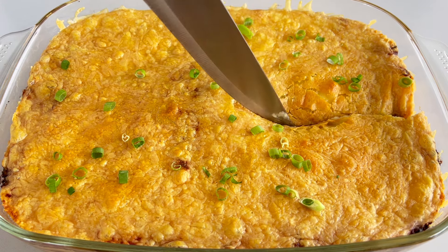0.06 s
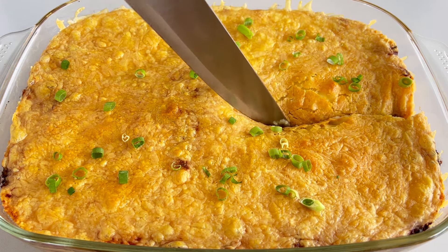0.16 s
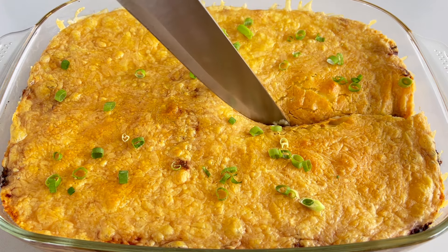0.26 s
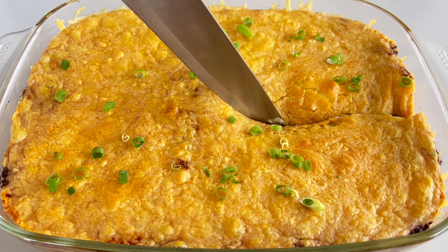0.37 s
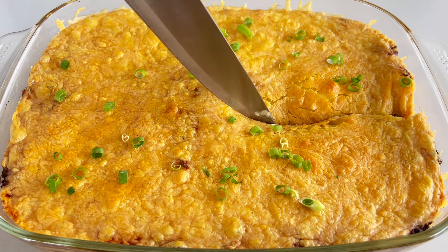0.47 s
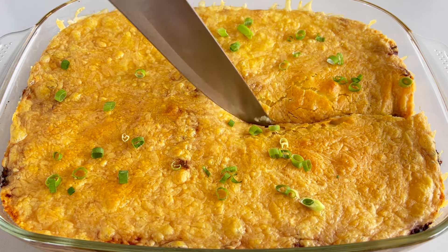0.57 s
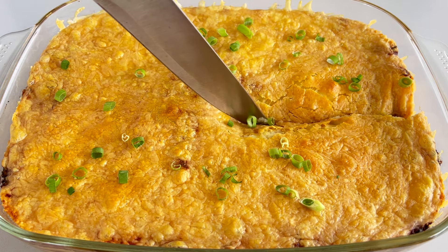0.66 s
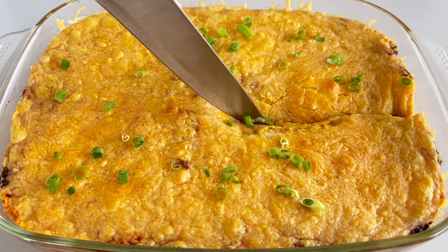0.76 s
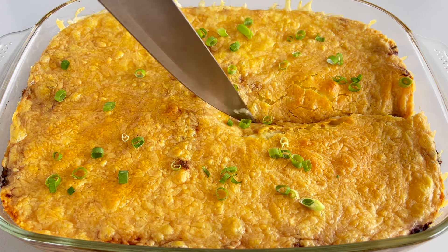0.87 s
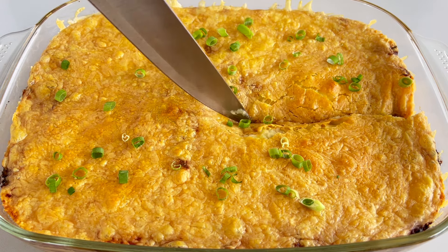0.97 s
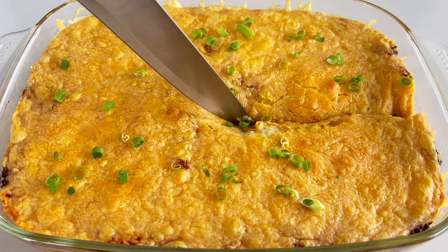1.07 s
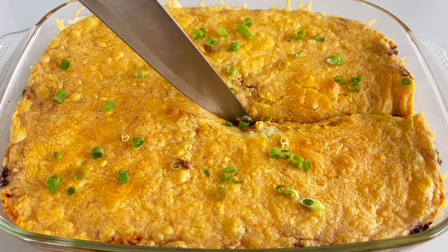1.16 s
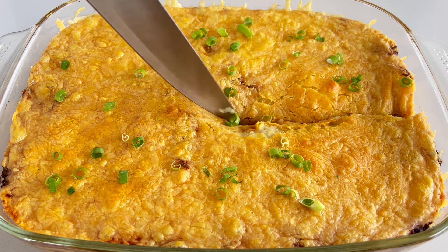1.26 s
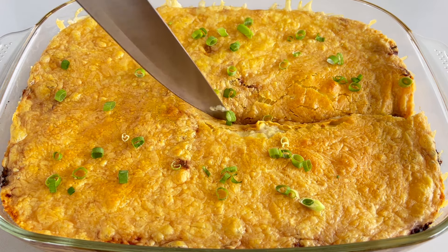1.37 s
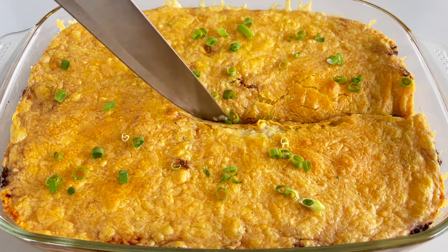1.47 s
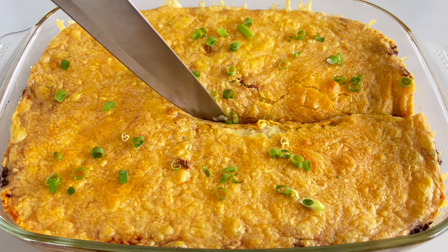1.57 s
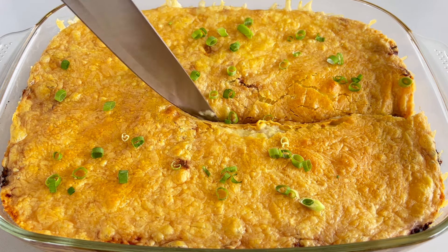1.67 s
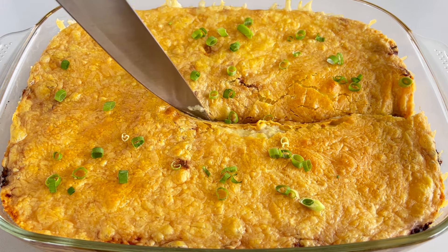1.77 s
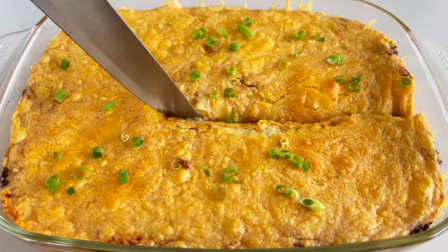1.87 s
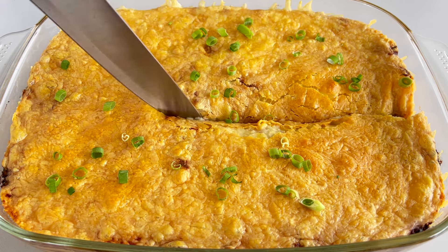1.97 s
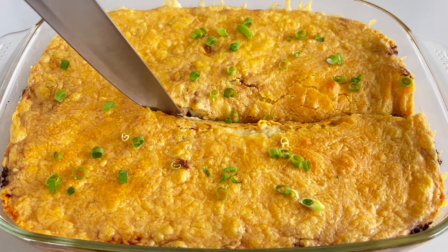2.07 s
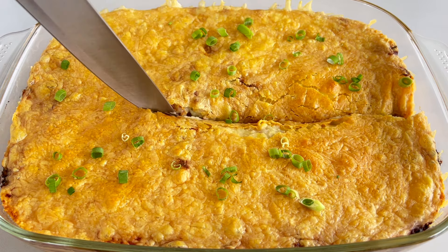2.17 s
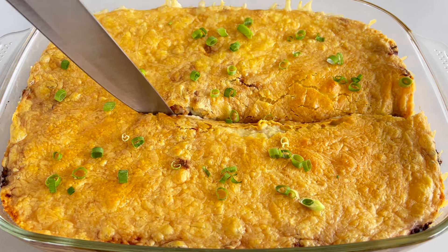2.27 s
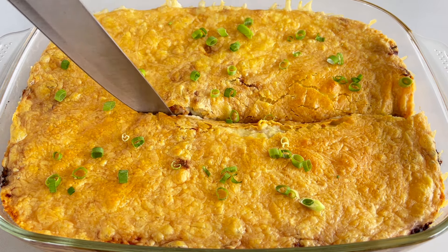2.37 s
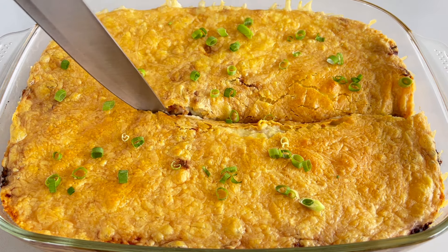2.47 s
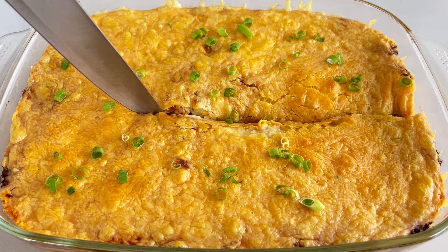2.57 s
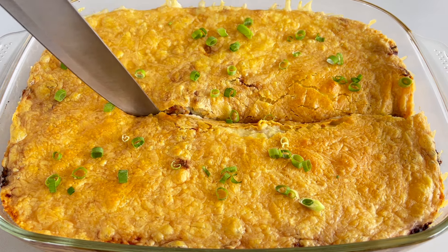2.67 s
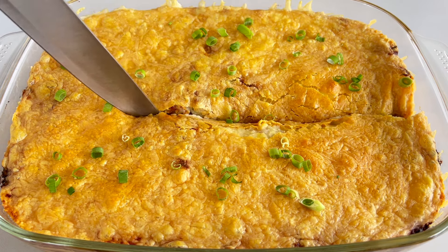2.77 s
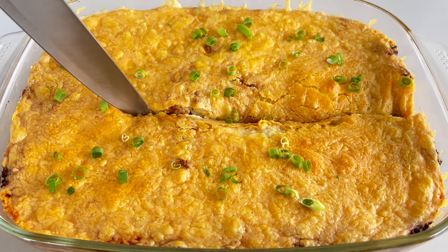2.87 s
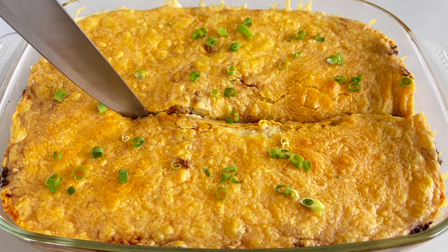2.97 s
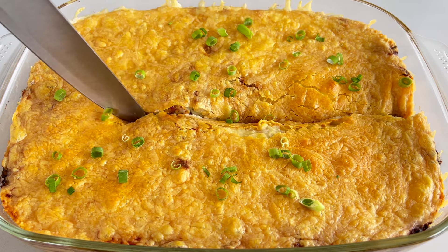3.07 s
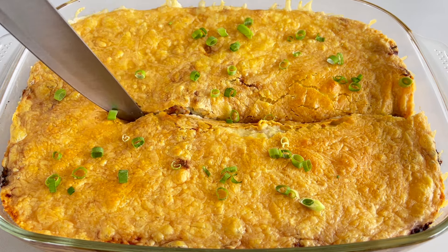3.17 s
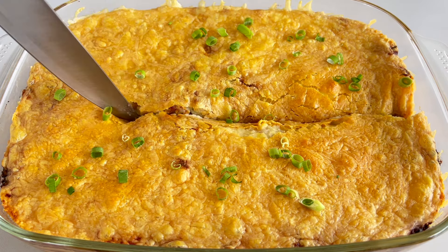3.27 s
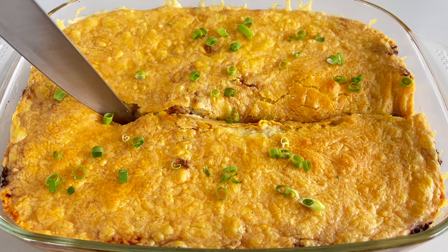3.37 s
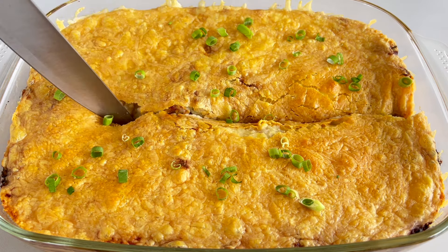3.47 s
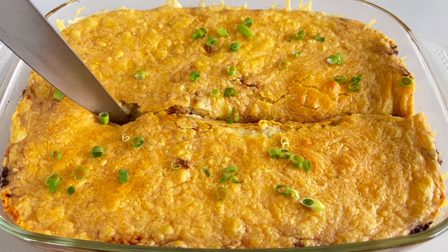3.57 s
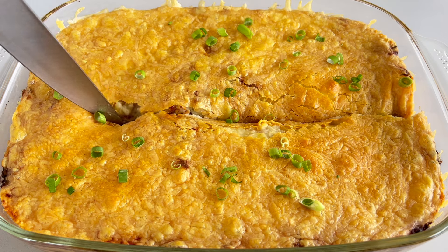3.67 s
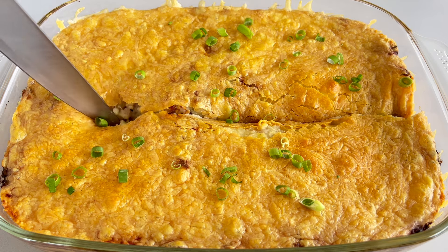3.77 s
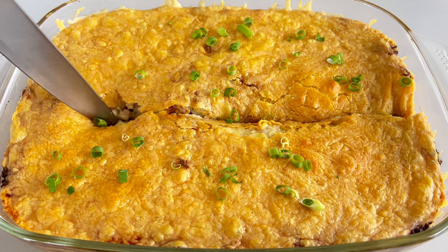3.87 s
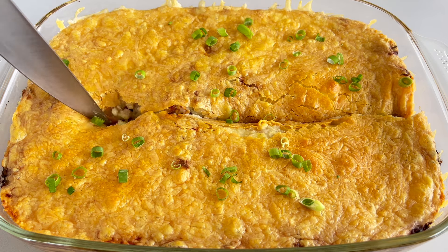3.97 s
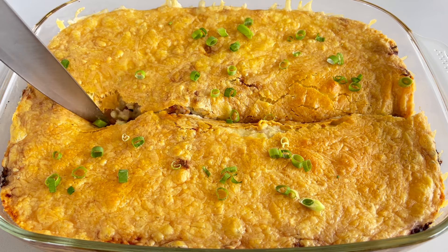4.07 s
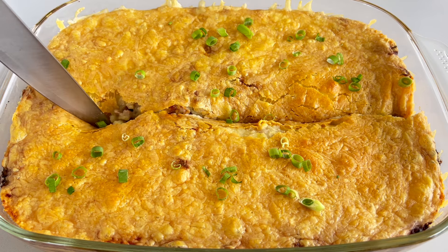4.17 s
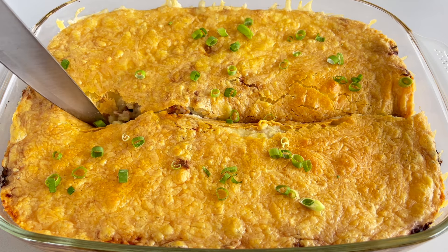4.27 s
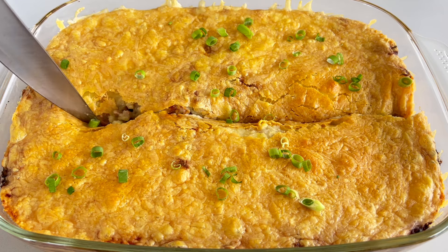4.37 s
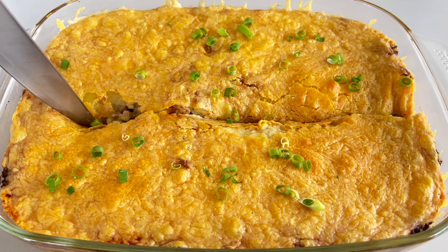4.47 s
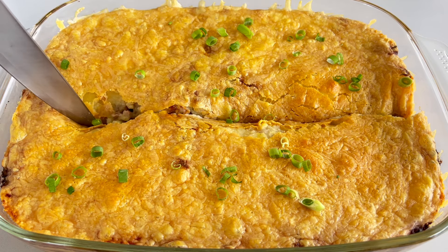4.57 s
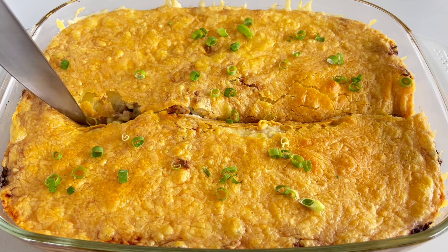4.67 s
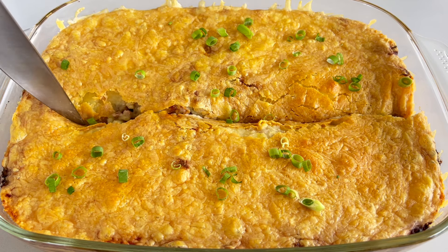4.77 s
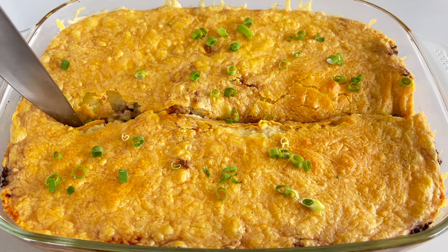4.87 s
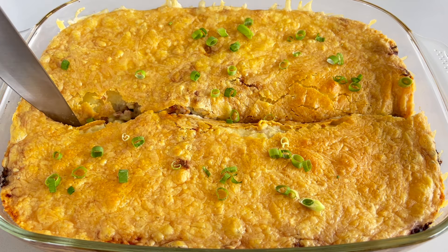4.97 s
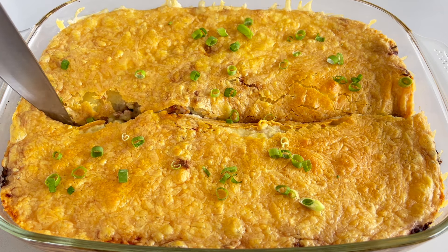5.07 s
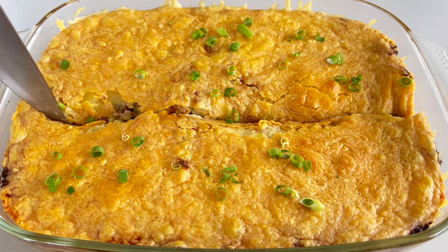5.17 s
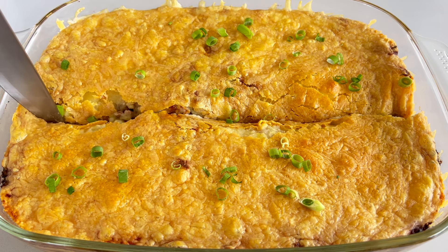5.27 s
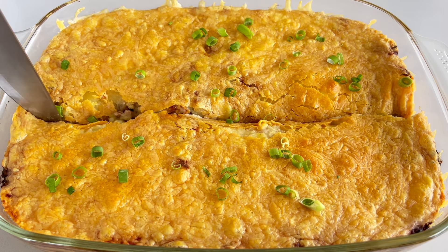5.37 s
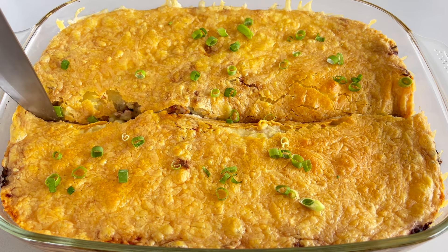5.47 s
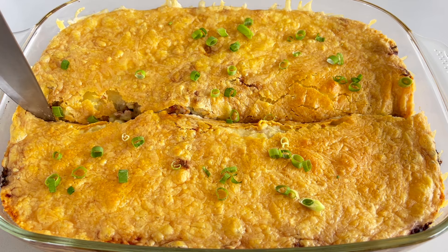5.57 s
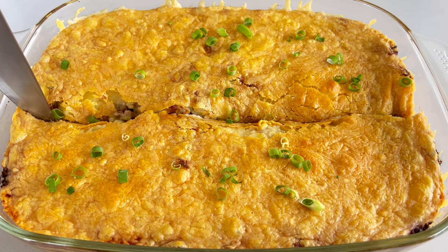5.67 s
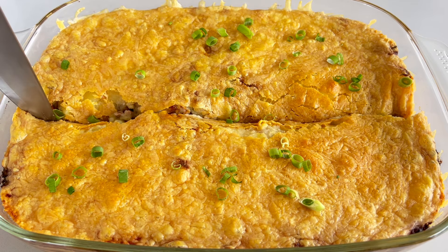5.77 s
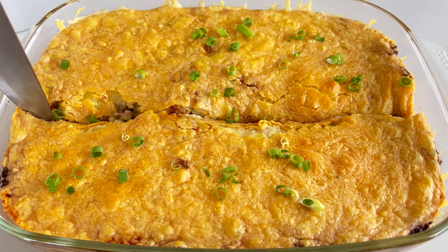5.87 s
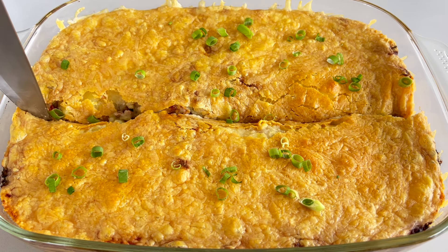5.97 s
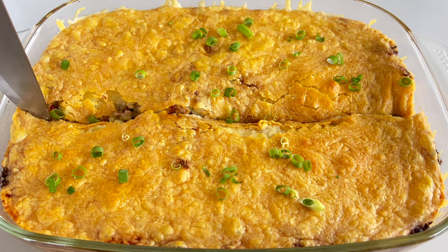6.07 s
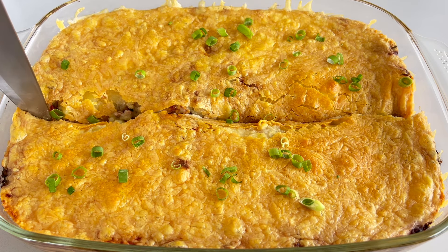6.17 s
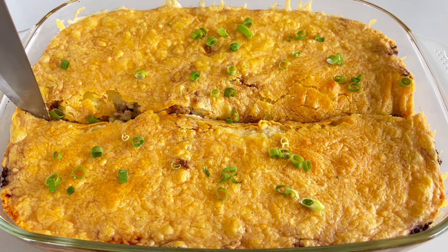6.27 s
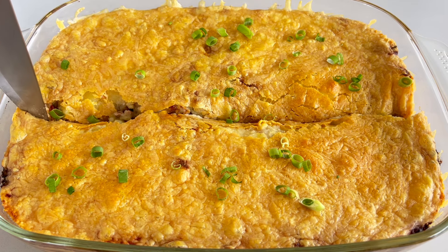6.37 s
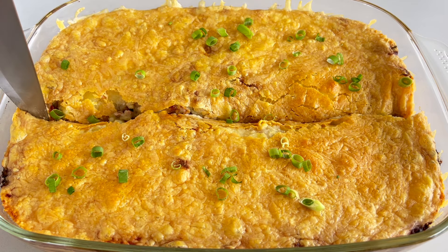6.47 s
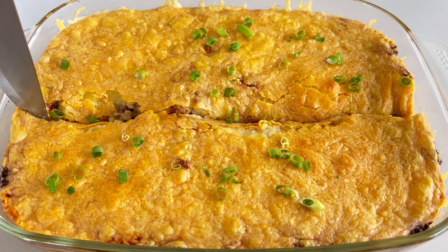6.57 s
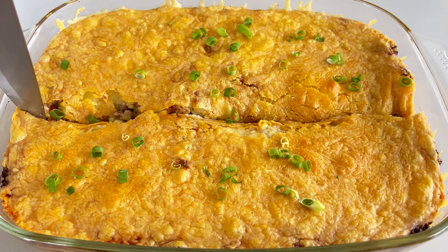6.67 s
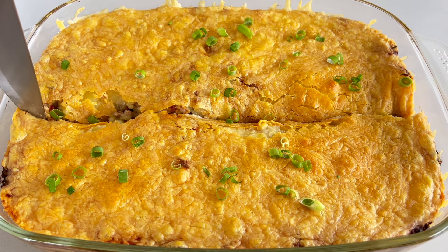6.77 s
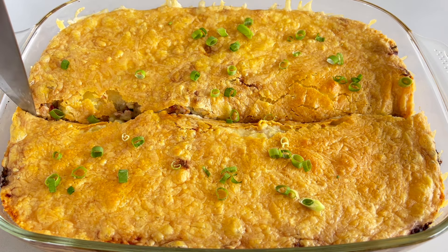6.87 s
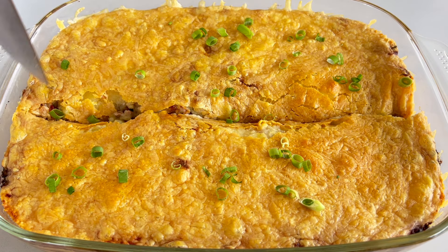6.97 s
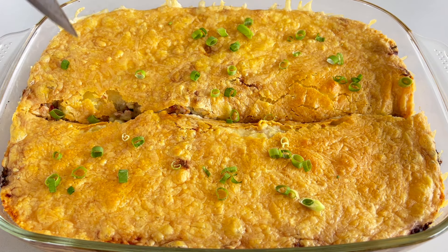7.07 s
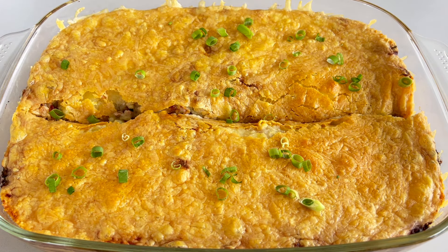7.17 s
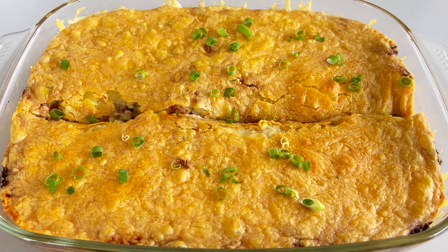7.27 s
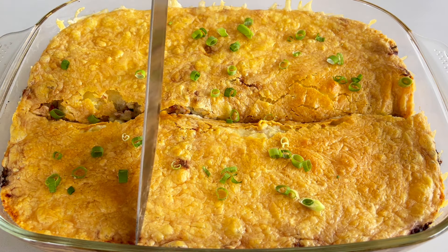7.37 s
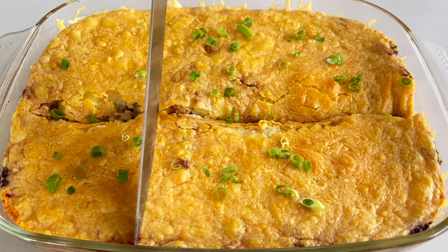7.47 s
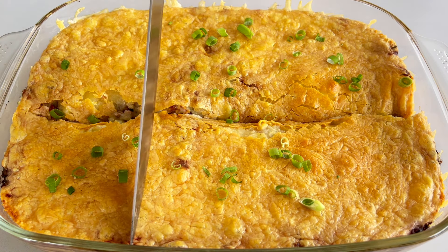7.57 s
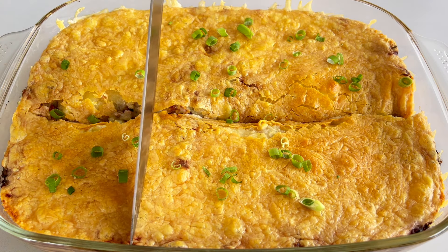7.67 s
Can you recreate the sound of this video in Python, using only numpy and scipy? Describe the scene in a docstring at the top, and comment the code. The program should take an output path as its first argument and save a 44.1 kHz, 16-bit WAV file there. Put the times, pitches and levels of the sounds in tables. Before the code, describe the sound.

A close stereo microphone hears a blade sawing in even strokes: airy rasp up, gritty crunch down, then a dull thud with a short glassy clack and blade tick. The dish is heavy and damped, so nothing rings long. The rhythm loosens near the end into scraping, small crust snaps and soft shoves. The small kitchen adds a slight short echo, quiet appliance noise and a wavering hum.

```python
"""A faint kitchen hum and a brief hiss, then a knife knocking on a glass dish, again and again.
Knocks ring damped dish modes plus a noise tick; scrapes drive the upper modes with random slips.
Between knocks the blade hisses through food (filtered noise and crumbs); the crust snaps (noise bursts).
Two close microphone ports hear the knife with unlike phase and level; a sparse echo follows.
The kitchen is coloured noise, a swelling rumble and two wavering tones."""
import sys
import numpy as np
from scipy import signal
from scipy.fft import rfft, irfft, next_fast_len
from scipy.io import wavfile

SR = 44100
rng = np.random.default_rng(int(sys.argv[2]) if len(sys.argv) > 2 else 0)


def output_pcm(signal):
    """Save a mono or channel-first signal as 16-bit PCM at the path in sys.argv[1].

    Samples are clipped to [-1, 1] before scaling.
    """
    pcm = np.clip(np.atleast_2d(signal).T, -1, 1) * 32767
    wavfile.write(sys.argv[1], SR, np.round(pcm).astype(np.int16))


N = 340893  # samples


def amp(db):
    """Decibels to gain."""
    return 10 ** (np.asarray(db) / 20)


def evened(x):
    """Scales to rms 1."""
    return x / np.sqrt(np.mean(x ** 2) + 1e-20)


def read(points, hz):
    """Reads a table on a log-frequency axis."""
    f, value = np.transpose(points)
    return np.interp(np.log(hz + 1), np.log(f + 1), value)


def along(points):
    """Reads the columns of a time curve at every sample."""
    s, *columns = np.transpose(points)
    return [np.interp(np.arange(N) / SR, s, c) for c in columns]


def add(mix, s, sound):
    """Mixes a sound in at time s."""
    part = mix[..., round(s * SR):][..., :sound.shape[-1]]
    part += sound[..., :part.shape[-1]]


def coloured(x, points):
    """Filters x by a table of gains."""
    size = next_fast_len(x.shape[-1])
    gain = amp(read(points, np.fft.rfftfreq(size, 1 / SR)))
    return irfft(rfft(x, size) * gain, size)[..., :x.shape[-1]]


def wander(hz):
    """Low-passed noise of rms 1, a slow random drift."""
    return evened(signal.lfilter(*signal.butter(2, hz, fs=SR), rng.standard_normal(N)))


def tone(hz, db):
    """A sine that wavers in level and pitch."""
    cycles = hz * np.arange(N) / SR + 0.06 * wander(1.3)
    return amp(db + 2 * wander(3)) * np.sqrt(2) * np.sin(2 * np.pi * cycles)


# appliance noise spectrum: (frequency [Hz], relative density [dB per Hz])
AIR_SPECTRUM = [(20, -31.5), (55, 3.5), (108, -3.5), (130, -13), (280, -13), (450, -16), (870, -25),
                (1100, -20.5), (1400, -21), (1780, -13), (2050, -23), (2500, -27.5), (2900, -39),
                (5000, -46.5), (6900, -34), (9000, -59), (16600, -78.5)]
# appliance noise likeness of the ports: (frequency [Hz], left-right correlation [-1..1])
AIR_LIKENESS = [(60, 1), (180, 0.77), (550, 0.32), (1650, -0.18), (4970, -0.12), (15000, -0.35)]
# swelling: (time [s], mean rumble level [dB], mean lower tone level [dB])
SWELL = [(0.0, -55.5, -64), (0.7, -53.5, -66.5), (1.3, -55.5, -62), (2.0, -49.5, -58), (2.6, -52.5, -52.5),
         (3.1, -53, -63.5), (3.7, -52, -69.5), (4.3, -56.5, -69), (5.05, -48, -59), (5.5, -57.5, -74),
         (6.3, -59, -77.5), (7.0, -74, -74), (7.73, -62.5, -70.5)]
AIR_DB = -52.5
HUM_HZ, HUM_MEAN_DB, DRONE_HZ = 444, -69, 218.8


def kitchen():
    """Steady appliance noise partly shared by the ports, a swelling rumble and two hum tones."""
    size = next_fast_len(N)
    left, other = rfft(rng.standard_normal((2, size)))
    same = np.clip(read(AIR_LIKENESS, np.fft.rfftfreq(size, 1 / SR)), -1, 1)
    right = same * left + np.sqrt(1 - same ** 2) * other
    pair = irfft(np.array([left, right]), size)
    air = amp(AIR_DB) * evened(coloured(pair, AIR_SPECTRUM))[:, :N]
    rumble_spectrum = [(20, -31.5), (55, -4), (100, -12.5), (220, -16.0), (400, -21.5), (800, -79.5)]
    rumble = evened(coloured(rng.standard_normal(N), rumble_spectrum))
    rumble_db, drone_db = along(SWELL)
    rumble *= amp(rumble_db + 1.6 * wander(3))
    return air + rumble + tone(HUM_HZ, HUM_MEAN_DB) + tone(DRONE_HZ, drone_db)


# echo decay: (frequency [Hz], t60 [s])
ECHO_DECAY = [(80, 0.3), (250, 0.24), (600, 0.34), (1500, 0.26), (4000, 0.29), (10000, 0.14)]


def room(x):
    """Sparse taps of random sign, each band dying at its own speed, partly shared by the ports."""
    places = np.arange(200, SR // 2, 20)
    taps = np.zeros((3, SR // 2 + 20))
    at = places + rng.integers(0, 20, (3, len(places)))
    np.put_along_axis(taps, at, rng.choice([-1., 1.], at.shape), 1)
    port_taps = taps[2] + 0.61 * taps[:2]
    hz, t, bands = signal.stft(port_taps, SR, nperseg=256)
    decay = amp(-60 * t / read(ECHO_DECAY, hz)[:, None])
    tail = signal.istft(bands * decay, SR, nperseg=256)[1]
    return signal.fftconvolve(x, tail / np.linalg.norm(tail[0]), axes=1)[:, :N]


# port phase: (frequency [Hz], left lead [rad])
PORT_LEAD = [(200, 0), (430, -.7), (780, 1.1), (1460, -.1), (3010, .8), (6120, 0), (7150, 0), (9900, -3.1),
             (13000, -6.2), (16400, -9)]
# port level: (frequency [Hz], left minus right [dB])
PORT_TILT = [(60, 1.4), (400, -0.2), (1500, -0.4), (4400, 4), (8100, 0.6), (15000, -1)]


def ports(x):
    """The two ports hear a near source with unlike phase and level."""
    size = next_fast_len(N)
    hz = np.fft.rfftfreq(size, 1 / SR)
    side = np.array([[0.5], [-0.5]])
    response = amp(side * read(PORT_TILT, hz)) * np.exp(1j * side * read(PORT_LEAD, hz))
    return irfft(rfft(x, size) * response, size)[:, :N]


# blade drawn up through the food: (middle [s], length [s], level [dB])
PULLS = [(0.0, .1, -67), (0.385, .17, -59), (0.823, 0.25, -63.5), (1.25, 0.22, -57), (1.654, 0.27, -64.5),
         (2.018, 0.15, -58.5), (2.431, .1, -66), (2.837, 0.19, -64), (3.203, 0.2, -65), (3.573, 0.17, -61),
         (3.928, 0.14, -59.5), (4.3, 0.16, -60), (4.654, 0.16, -62), (5.058, 0.19, -63), (5.474, 0.12, -62),
         (5.899, .14, -62.5), (6.245, 0.092, -65), (6.592, .11, -70.5), (7.057, .13, -68),
         (7.562, 0.11, -62.5)]
# blade pushed down through the crust: (landing [s], travel [s], level [dB])
PUSHES = [(0.15, 0.083, -58.5), (0.584, 0.09, -57), (1.04, 0.14, -59), (1.446, 0.1, -55.5),
          (1.849, 0.094, -60), (2.218, 0.07, -62), (2.608, 0.09, -62), (3.008, 0.068, -61),
          (3.384, 0.081, -63), (3.785, 0.18, -67), (4.119, 0.17, -66.5), (4.474, .11, -58.5),
          (4.864, 0.11, -56.5), (5.29, 0.24, -63), (5.717, 0.2, -63), (5.99, 0.023, -72),
          (6.439, .1, -71.5), (6.85, 0.078, -61.5)]
PULL_ARCH_POWER, PUSH_RISE_POWER, SETTLE_T60_S = 2.3, 1, 0.37


def strokes():
    """Rubbing strength: a pull arches up and down; a push grows until it lands, then settles."""
    t = np.arange(N) / SR
    pull, push = np.zeros(N), np.zeros(N)
    for middle, length, db in PULLS:
        arch = np.cos(np.pi * np.clip((t - middle) / length, -0.5, 0.5)).clip(0)
        pull += amp(db) * arch ** PULL_ARCH_POWER
    for landing, travel, db in PUSHES:
        rise = np.clip(1 + (t - landing) / travel, 0, 1) ** PUSH_RISE_POWER
        push += amp(db - 60 * np.maximum(t - landing, 0) / SETTLE_T60_S) * rise
    return pull, push


# rubbing spectrum: (frequency [Hz], relative density [dB per Hz])
RUB_SPECTRUM = [(1000, -32), (2500, -2), (4000, -5.5), (6000, -7.5), (8000, 1), (11000, -7.5),
                (15600, -0.5), (16200, -29.5)]
CRUMBS_PER_S, CRACKS_PER_S, CRACKS_DB = 1500, 160, -1.5  # cracks against the rub


def slide():
    """Rubbing: hiss mixed with tiny crumbs breaking; bits of crust crack, most of all in a push."""
    crumb_size = amp(4.1 * np.minimum(rng.exponential(1, N), 5))
    crumbs = crumb_size * (rng.random(N) < CRUMBS_PER_S / SR) * rng.choice([-1, 1], N)
    rub = evened(coloured(rng.standard_normal(N) + 0.3 * evened(crumbs), RUB_SPECTRUM))
    crack_size = amp(4.0 * np.minimum(rng.exponential(1, N), 4))
    hits = crack_size * (rng.random(N) < CRACKS_PER_S / SR)
    envelope = signal.lfilter([1], [1, -np.exp(-1 / (0.0006 * SR))], hits)  # 0.6 ms decay
    cracks = evened(coloured(envelope * rng.standard_normal(N), RUB_SPECTRUM))
    pull, push = strokes()
    return (pull + push) * rub + (push + 0.4 * pull) * amp(CRACKS_DB) * cracks


# crust snaps: (time [s], relative level [dB], brightness [Hz])
SNAPS = [(0.0687, -45, 13100), (0.5445, -38, 7700), (0.9535, -37.5, 12700), (1.3807, -16.5, 14400),
         (1.392, -31, 14530), (2.177, -45.5, 13600), (2.566, -43, 7280), (2.991, -46, 3030),
         (3.6833, -43, 8000), (4.104, -47, 3320), (4.777, -43.5, 13100), (5.1738, -38, 4100),
         (5.186, -31, 13000), (5.202, -25.5, 10800), (5.2175, -22, 13000), (5.2265, -22, 13100),
         (5.2578, -30, 8160), (5.278, -33, 3640), (5.405, -47.5, 8500), (5.426, -45.5, 6440),
         (5.5223, -49, 13100), (5.56, -37, 12900), (5.593, -33, 13400), (5.6146, -43, 8100),
         (5.685, -32, 7600), (5.983, -30.5, 13060), (6.4009, -44, 4740), (6.431, -34, 13900),
         (6.45, -35.5, 12900), (6.8929, -21.5, 13700)]


def snaps():
    """Each snap is a tiny broad noise burst, brighter or duller, with a short and a faint longer decay."""
    out, t = np.zeros(N), np.arange(2048) / SR
    decay = amp(-60 * t / 0.0073) + amp(-17.5 - 60 * t / 0.042)
    for s, db, hz in SNAPS:
        spectrum = [(hz / 10.0, -35), (hz / 3.66, -9), (hz, 0), (hz * 2.2, -5), (hz * 3.3, -22)]
        burst = evened(coloured(rng.standard_normal(2048), spectrum))
        add(out, s, amp(db - 8.5) * burst * decay)
    return out


# modes of the food-damped dish on the counter: (frequency [Hz], relative level [dB], tail t60 [s])
DISH_MODES = [(64, -2, 0.22), (97.8, 0.5, 0.49), (150.9, 8.5, 0.28), (221, -10.5, 0.71), (266.8, -3, 0.25),
              (341.1, 5, 0.3), (535, -6.5, 0.41), (595, -3.5, 0.25), (648.2, -6.5, 0.21), (716.3, 4, 0.12),
              (751.8, 6, 0.12), (874, -12, 0.35), (934, -7, 0.11), (1070, -10, 0.28), (1175, -14.5, 0.14),
              (1365, -13.5, 0.025), (1376, -6.5, 0.21), (1464, 7, 0.037), (1542, 6, 0.042),
              (1710, -13.5, 0.13), (2200, -5.5, 0.07), (2428, -23, 0.13), (2247, 4, 0.043),
              (2310, -13.5, .08), (2988, -3, 0.061), (3658, -6, 0.053), (3758, -27.5, 0.046),
              (3865, -5.5, 0.057), (4200, -8.5, 0.052), (4578, -8.5, 0.053)]


def rings(t):
    """Dish modes as turning arrows that swell in: a fast-dying head and a faint long tail."""
    hz, db, t60 = np.transpose(DISH_MODES)[:, :, None]
    sign = (-1.) ** np.arange(len(DISH_MODES))[:, None]  # alternating signs soften the attack
    swell = 1 - np.exp(-t * hz / 1.34)
    swell = swell * (1 - np.exp(-t * (hz / 300) ** 2 / 0.0013))  # heavy counter is slowest to move
    arrow = sign * amp(db) * swell * np.exp(2j * np.pi * hz * t)
    head = arrow * amp(-60 * t / (0.53 * t60))
    tail = arrow * amp(-8.5 - 60 * t / t60)
    return hz[:, 0], head, tail


# borders between thud, rocking, bottom, walls, rim and tick modes: (frequency [Hz])
PART_BORDERS_HZ = (250, 450, 1200, 1900, 2900)
# edge grinding along the glass: (start [s], length [s], first drive [dB], last drive [dB])
SCRAPES = [(4.986, 0.18, -58, -61), (5.235, 0.047, -51, -51), (5.643, 0.064, -56, -42.5),
           (6.035, 0.11, -62, -80), (6.841, 0.1, -46, -79)]


def scrapes():
    """Uneven slips of the edge keep the upper modes of the dish buzzing."""
    hz, head, _ = rings(np.arange(SR // 5) / SR)
    body = head[hz > PART_BORDERS_HZ[1]].imag.sum(0)
    body /= np.linalg.norm(body)
    out = np.zeros(N)
    for s, length, first_db, last_db in SCRAPES:
        count = round(length * SR)
        slips = rng.standard_normal(count) * (rng.random(count) < 1200 / SR)  # 1200 slips per s
        drive = evened(slips) * amp(np.linspace(first_db, last_db, count))
        add(out, s, signal.fftconvolve(drive, body))
    return out


# knocks on the glass: (time [s], walls relative level [dB],
# then against the walls: counter thud [dB], bottom [dB], rim [dB], blade tick [dB])
KNOCKS = [(0.15, -20, -11.5, -3.5, -4.5, -5.5), (0.584, -17.5, -10, -1.5, -0.5, -3),
          (1.054, -25.5, -8.5, 2, 4, -3), (1.446, -16, -8, 1, 5, -4), (1.849, -12.5, -10.5, -1, -2, -8.5),
          (2.218, -21, -6.5, 0, -5, -8.5), (2.608, -19.5, -7, -2, -10, -8.5),
          (3.008, -16.5, -8.5, -6, -11, -9.5), (3.384, -16.5, -7.5, -5.5, -10, -8),
          (3.785, -30.5, -5, -3, -7.5, -6.5), (4.119, -29.5, -1.5, -1.5, -9, -12),
          (4.474, -21.5, -3, -3.5, -1, -7.5), (4.864, -17, -4.5, -5, -4.5, -5.5),
          (4.999, -48.5, -9, 4, -19, -20), (5.292, -32, 4.5, 0.5, -3, -4),
          (5.64, -40.5, -6.5, -4, -23, -14.5), (5.717, -27, 0, -0.5, -1.5, -7),
          (6.01, -52, -2, -2.5, -19, -27), (6.085, -59, 8, 0.5, -11, -22), (6.837, -41.5, -9, -2, 1, -15),
          (7.409, -37.5, -6, 3.5, 1.5, -8.5)]
# soft shoves that only jog the dish: (time [s], base level [dB])
NUDGES = [(5.982, -47.5), (6.336, -44), (6.653, -49.5)]
# nudge parts against the base: (thud [dB], rocking [dB], bottom [dB], walls [dB], rim [dB], tick [dB])
NUDGE_PARTS_DB = (2.5, -20.5, -15.5, -21, -28, -30.5)
ROCK_DB = -1.5  # against the thud


def blows():
    """Time and level of every part of the dish for each knock and nudge."""
    blow_list = []
    for s, db, thud_db, bottom_db, rim_db, tick_db in KNOCKS:
        parts_db = np.array([thud_db, thud_db + ROCK_DB, bottom_db, 0, rim_db, tick_db])
        blow_list.append((s, db + parts_db))
    return blow_list + [(s, db + np.array(NUDGE_PARTS_DB)) for s, db in NUDGES]


# blade tick spectrum: (frequency [Hz], relative density [dB per Hz])
TICK_SPECTRUM = [(150, -39.5), (450, -2.5), (1100, 1.5), (1900, -6), (3000, -5), (4400, -6), (5800, -9),
                 (9000, -7), (12000, -17.5), (15500, -17.5), (16800, -44)]
CHATTER_20DB_MS = 8.5  # time to fall 20 dB
MODES_DB, TICK_DB = -3.0, -2.0  # trims on the blow levels


def knocks():
    """The blade lands and chatters on the glass; each spot weights the modes a little differently."""
    t = np.arange(SR // 3) / SR
    hz, head, tail = rings(t)
    part_of_mode = np.searchsorted(PART_BORDERS_HZ, hz)
    member = part_of_mode == np.arange(len(PART_BORDERS_HZ) + 1)[:, None]
    energy = np.linalg.norm(member @ (head + tail).imag, axis=1)
    knots = np.maximum(1 - abs(t * 180 - np.arange(62)[:, None]), 0)  # 180 per s, linear between
    phase_spread = 0.6 * np.minimum(hz / 550, 1) ** 2 * np.clip(700 / hz, 0.6, 1)  # rad
    tick_decay = amp(-60 * t / 0.035) + amp(-5.0 - 60 * t / 0.022) + amp(-30.5 - 60 * t / 0.12)
    out = np.zeros((2, N))
    for s, parts_db in blows():
        weight = member * amp(rng.standard_normal(len(hz)))
        # random left-right phase per mode and blow, for width
        phase = phase_spread * rng.standard_normal(len(hz))
        # random shimmer roughens each ring, as close modes beating would
        draws = rng.standard_normal((len(hz), 124)).view(complex)
        shimmer = draws @ knots * np.minimum(hz / 700, 1)[:, None]
        modes = head * (1 + 0.87 * shimmer) + tail * (0.5 + 1.08 * shimmer)
        parts = np.array([(weight * np.exp(1j * side * phase)) @ modes for side in (1, -1)]).imag
        chatter = 0.058 * rng.standard_normal(2048) * amp(-20 * t[:2048] / (CHATTER_20DB_MS / 1000))
        chatter[0] = 1
        shaken = signal.fftconvolve(parts, chatter[None, None], axes=2)[..., :len(t)]
        shaken *= (energy / np.linalg.norm(shaken, axis=2).mean(0))[:, None]
        tick = evened(coloured(rng.standard_normal(len(t)), TICK_SPECTRUM))
        tick *= np.minimum(t / 0.00075, 1) * tick_decay
        add(out, s, amp(parts_db + MODES_DB) @ shaken + amp(parts_db[-1] + TICK_DB) * tick)
    return out


def scene():
    """Knife sounds at the ports, their echo, and the kitchen."""
    knife = ports(knocks() + scrapes() + snaps() + slide())
    return knife + amp(-11.5) * room(knife) + kitchen()


EDGE_HZ = 16700


def record(dry):
    """The band limit: a linear-phase low-pass."""
    lowpass = signal.firwin(511, EDGE_HZ, window=("kaiser", 9), fs=SR)
    return signal.oaconvolve(dry, lowpass[None], "same")


dry = scene()
out = record(dry)
output_pcm(out)
```